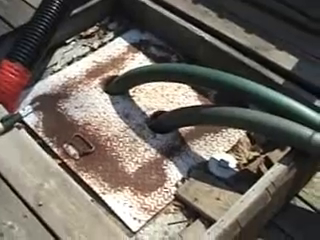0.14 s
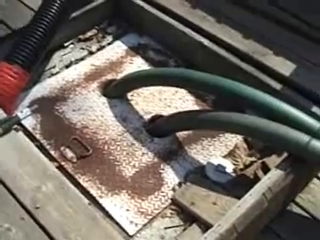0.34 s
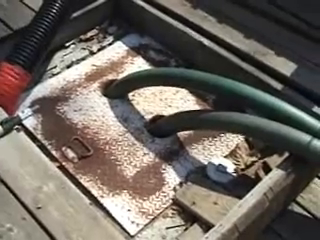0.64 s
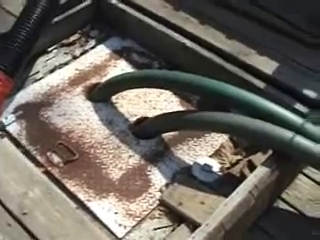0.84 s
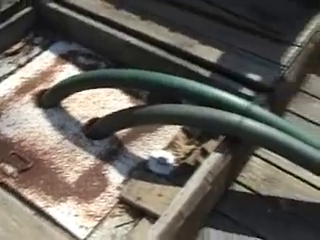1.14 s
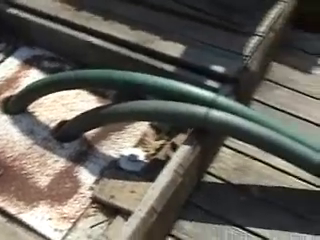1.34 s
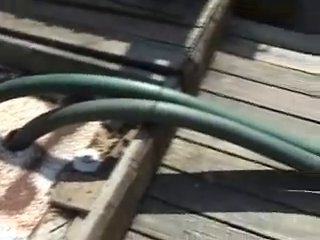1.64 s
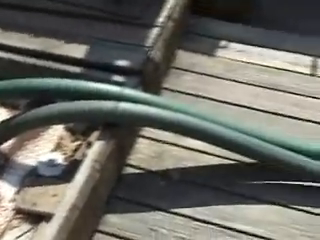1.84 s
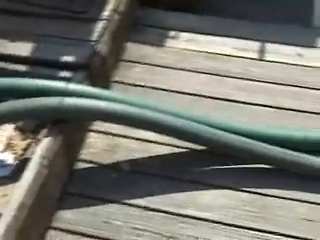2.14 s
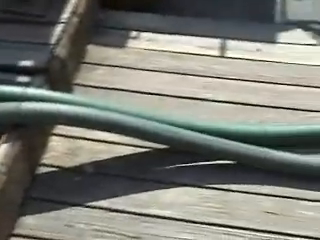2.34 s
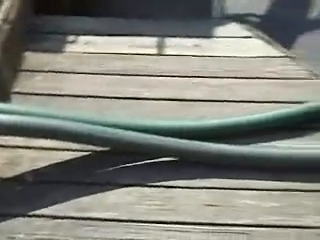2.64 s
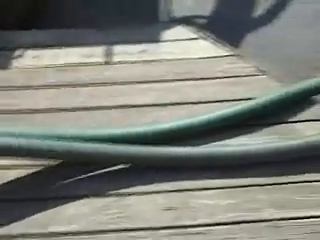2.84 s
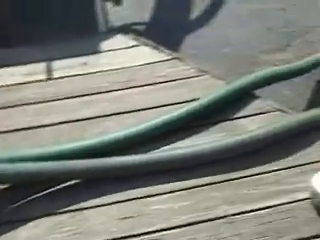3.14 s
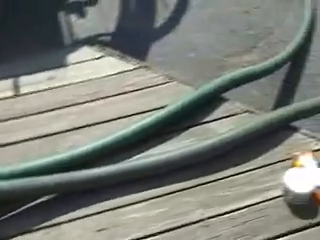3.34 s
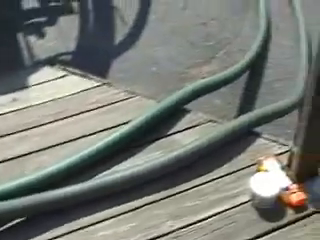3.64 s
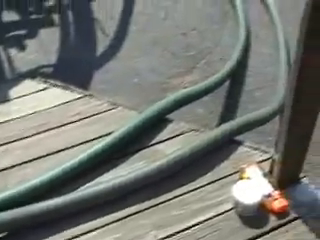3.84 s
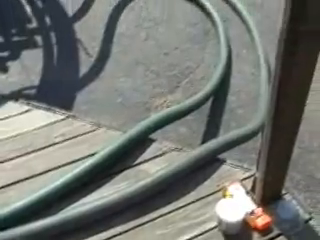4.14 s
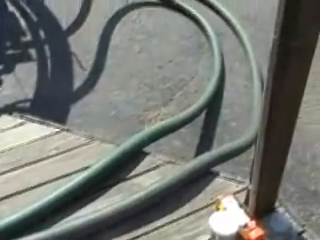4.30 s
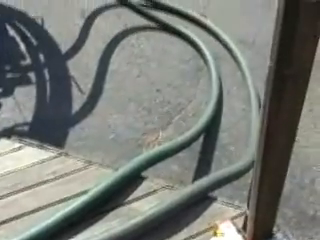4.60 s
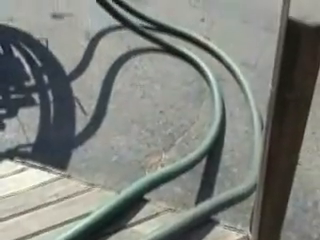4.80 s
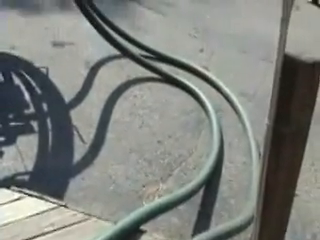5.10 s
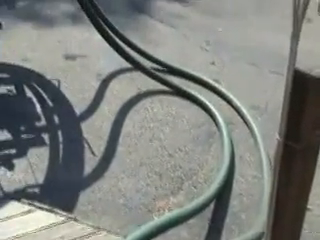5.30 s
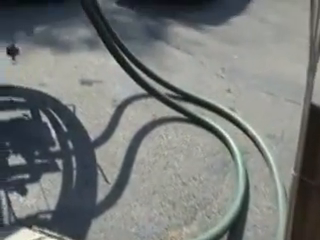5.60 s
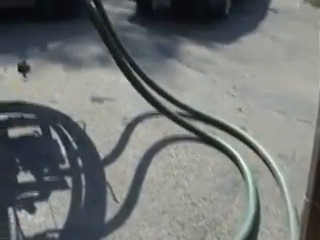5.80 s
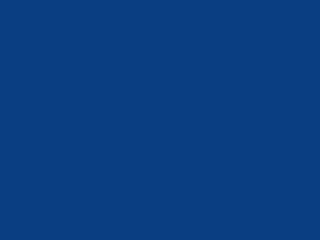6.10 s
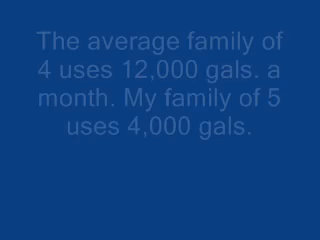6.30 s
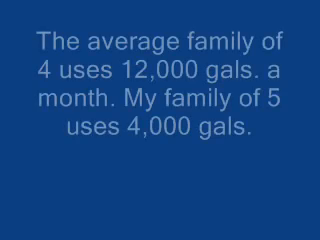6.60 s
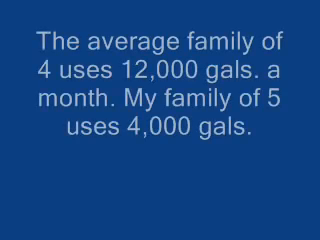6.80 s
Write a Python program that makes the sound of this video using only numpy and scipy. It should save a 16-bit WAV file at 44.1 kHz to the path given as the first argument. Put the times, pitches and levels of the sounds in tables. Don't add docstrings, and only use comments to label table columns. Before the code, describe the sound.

From the first instant a truck engine and its water pump run loudly at a fixed speed, a few metres away outdoors. The hum is low and buzzing, with a fast flutter of about twenty-one beats per second, covered by a wide roar of fan and water, rapid valve clacks and pulsing air hiss. A hollow tone near 420 hertz and a wavering panel ring sit inside it. From about 1 to 2 seconds the handheld microphone swings toward the pump; whine, spray and metallic clatter grow brighter. Around 2.7 seconds the panel ring fades. Soft low wind bumps come and go, stronger near 4.5, 4.8 and 6.1 seconds. After 4.5 the low hum thins slightly, while the hollow tone dips briefly near 4.9. The stereo balance drifts gently. At about 6.2 seconds everything cuts off, leaving silence until about 7 seconds.

```python
import sys
import numpy as np
from scipy import signal
from scipy.fft import rfft, irfft, next_fast_len
from scipy.io import wavfile
from scipy.ndimage import uniform_filter1d, map_coordinates

SR = 44100
rng = np.random.default_rng(int(sys.argv[2]) if len(sys.argv) > 2 else 0)


def inscribe(sig):
    pcm = np.round(np.clip(np.atleast_2d(sig).T, -1, 1) * 32767)
    wavfile.write(sys.argv[1], SR, pcm.astype(np.int16))


def volts(x):
    e = np.asarray(x, float) / 20
    return 10 ** e


N = 306495
TIME_S = np.arange(N) / SR
CYCLE_HZ = 21.53
STOP_S = 6.232

# (time [s], peak level [dB], half length [s])
GUST_TIMES = [(0.4, -63, 0.2), (1.1, -50, 0.06), (1.46, -45, 0.08), (2.1, -46.5, 0.066), (2.35, -46, 0.12),
              (2.67, -46.5, 0.1), (3.24, -51.5, 0.16), (3.76, -43.5, 0.12), (4.06, -43.5, 0.16),
              (4.46, -37.5, 0.1), (4.77, -37.5, 0.18), (5.27, -47, 0.27), (6.07, -35.5, 0.08)]
# (time [s], facing the pump [0-1], left minus right [dB])
CAMERA_SWING = [(0.05, 0, -2), (0.8, 0.0, -3.5), (1.75, 0.44, -2.5), (2.05, 0.54, -2), (2.3, 0.5, 0),
                (3.5, 0.65, 2), (4.05, 0.5, 4), (4.22, 0.74, 1.5), (4.48, 0.6, 3.5), (4.72, 0.9, -1),
                (5.1, 0.66, 2.5), (6.0, 0.87, -0.5), (6.22, 0.97, 1)]
# (time [s], extra travel time [ms])
TRAVEL_LAG = [(0.2, 0.44), (0.7, -0.53), (1.2, -1.49), (1.7, -1.83), (2, -1.03), (2.4, -0.67), (3, -0.61),
              (3.6, -0.49), (4.2, 0.08), (4.6, 0.16), (5, -0.36), (5.4, 0.11), (5.7, 0.76), (6, 0.69)]
# (start [s], end [s])
WIDE_SPANS = [(0.053, 0.102), (0.145, 0.22), (0.286, 0.429), (0.463, 0.606), (0.732, 0.851), (0.924, 1.034),
              (1.06, 1.202), (1.343, 1.542), (1.622, 1.67), (3.632, 3.674), (3.942, 4.007), (4.033, 4.132),
              (4.457, 4.512), (4.549, 4.61), (5.195, 5.308), (5.723, 5.769)]
# (frequency [Hz], level [dB per Hz])
ROAR_SPECTRUM = [(40, -18), (70, -8), (200, -0.5), (420, 1.5), (560, -2.5), (900, 1.5), (1200, -1),
                 (1400, -1.5), (1800, -2.5), (2200, -3.5), (2600, -4.5), (3400, -5.5), (3700, -8.5),
                 (4000, -21)]
# (frequency [Hz], level [dB per Hz])
ROAR_SIDE_SPECTRUM = [(40, -7), (100, -11), (170, -4.5), (300, 5.5), (600, 3.5), (1600, 4.5), (2300, 3.5),
                      (3100, 2.5), (3600, 0), (3950, -11.5), (4200, -19.5)]
# (frequency [Hz], level [dB per Hz])
HISS_SPECTRUM = [(3300, -18.5), (3900, -2.5), (5000, -1.5), (6200, -4), (7200, -7), (9500, -30)]
# (frequency [Hz], level [dB per Hz])
SPRAY_SPECTRUM = [(5200, -24), (6600, -5), (7600, 0), (9000, -1), (11430, -4), (11480, -20), (11700, -24),
                  (11800, -55)]
# (place [0-1], length [cycles], level [dB])
VALVE_BLOWS = [
    (.29, .13, -1),
    (.66, .12, -10),
]
# (place [0-1], length [cycles], level [dB])
ROAR_KNOCK = (.7, 0.098, -4.5)
# (frequency [Hz], width [Hz], level [dB])
COVER_MODES = [
    (5510, 140, 0),
    (7070, 90, -6),
    (8330, 90, -8),
]
# (ratio to the lowest [1], level [dB])
BODY_PANEL_MODES = [(1, 1.5), (1.43, -6.5), (1.74, -2), (2.1, -8)]
# (multiple of the cycle [1], level [dB], lobe gain [dB],
# lobe time [s], lobe half width [s])
PUMP_LOBES = [(22, -49, 9, 1.2, 2.4), (24, -45.5, 8.5, 0.8, 1.5), (27, -48, 9.5, 5.1, 2.5),
              (30, -46.5, 13, 2.25, 0.8), (30, -47, 10, 6.1, 0.6), (47, -41, 3.5, 3.7, 1.5),
              (64.04, -40.5, 4, 2.7, 0.4)]
# (multiple of the cycle [1], level [dB])
WHINE_ORDERS = [(29, -18), (33, -12.5), (34, -21), (36, -8), (38, -9.5), (39, -14), (42, -13.5), (44, -9.5),
                (46, -12.5), (49, -13), (51, -20), (63, -9.5), (66, -12.5), (69, -13.5), (91, -18.5)]
# (multiple of the cycle [1], level [dB])
ENGINE_ORDERS = [(3, -11), (4, -16.5), (5, -12), (6, -7.5), (7, -19.5), (8, -9), (9, -7), (10, -5.5),
                 (11, -3.5), (12, -4.5), (13, -6.5), (14, -5.5), (15, -8), (16, -13), (18, -17), (19, -8),
                 (20, -21), (21, -20), (22, -16), (23, -17), (25, -17.5)]


def level(x, db):
    return x * volts(db) / np.sqrt(np.mean(x ** 2))


def curves(table):
    s, *columns = np.transpose(table)
    return [np.interp(TIME_S, s, c) for c in columns]


def bump(at_s, half_s, order=2):
    return np.exp(-((TIME_S - at_s) / half_s) ** order)


def step(at_s, span_s):
    return .5 + .5 * np.tanh((TIME_S - at_s) / span_s)


def walk(rate):
    hold = int(SR / 64 / rate)
    steps = np.repeat(rng.standard_normal(N // 64 // hold + 2), hold)
    smooth = uniform_filter1d(uniform_filter1d(steps, hold), hold)
    return 1.3 * np.interp(np.arange(N) / 64, np.arange(len(steps)), smooth)


def colour(x, shape):
    hz, db = np.transpose(shape)
    size = next_fast_len(N)
    log_f = np.log(np.arange(size // 2 + 1) * SR / size + 1e-9)
    gain = volts(np.interp(log_f, np.log(hz), db, left=-90, right=-90))
    return irfft(rfft(x, size) * gain, size)[:N]


def patchy(shape, gate, patch_db, rate, count):
    size = next_fast_len(N)
    edges = np.geomspace(shape[0][0], shape[-1][0], count + 1)
    x = rfft(colour(rng.standard_normal(N) * gate, shape), size)
    f = np.arange(len(x)) * SR / size
    out = 0
    for lo, hi in zip(edges, edges[1:]):
        band = irfft(x * ((f >= lo) & (f < hi)), size)[:N]
        out = out + band * volts(patch_db * walk(rate))
    return level(out, 0)


def puffs(cycle, table, scatter_db):
    size = volts(scatter_db * rng.standard_normal((int(cycle[-1]) + 3, len(table))))
    out = np.ones(N)
    for k, (place, decay, db) in enumerate(table):
        p = cycle + 1 - place
        out = out + volts(db) * size[p.astype(int), k] * np.exp(-(p % 1 / decay) ** 2)
    return uniform_filter1d(out, size=30)


def tones(cycle, table, wander_db, slip, rate, scatter):
    out = 0
    for k, db in table:
        start = scatter * rng.standard_normal()
        turns = k * cycle + k * k / 5 + start + slip * walk(rate)
        out = out + volts(db + wander_db * walk(rate)) * np.sin(2 * np.pi * turns)
    return out


def drone(hz, db, rate, steady):
    swing = steady + walk(rate) + 1j * walk(rate)
    return volts(db) * level(np.real(swing * np.exp(2j * np.pi * np.cumsum(hz) / SR)), 0)


def wind():
    gusts = sum(volts(db) * bump(s, half) for s, db, half in GUST_TIMES)
    shape = [(8, -11), (20, -9.5), (45, -5.5), (90, -16.5), (200, -45.5)]
    return level(colour(rng.standard_normal(N), shape), 0) * (volts(-74) + gusts)


def uncorrelated(gate, roar_db, hiss_db, spray_db, roar_gate):
    roar = level(colour(rng.standard_normal(N) * roar_gate, ROAR_SIDE_SPECTRUM), -6)
    hiss = level(colour(rng.standard_normal(N) * gate, HISS_SPECTRUM), -7.5)
    spray = level(colour(rng.standard_normal(N) * gate, SPRAY_SPECTRUM), -5)
    return roar * volts(roar_db) + hiss * volts(hiss_db) + spray * volts(spray_db)


def water_spray(gate, db):
    return volts(db + 1.1) * patchy(SPRAY_SPECTRUM, gate, patch_db=.5, rate=11, count=2)


def air_hiss(gate, db):
    return volts(db - 1.4) * patchy(HISS_SPECTRUM, gate, patch_db=.5, rate=10, count=2)


def fan_roar(gate, db):
    return volts(db - 0.31) * patchy(ROAR_SPECTRUM, gate, patch_db=0.68, rate=7.9, count=6)


def clatter(cycle, morph_s):
    patterns = rng.standard_normal((int(N / SR / morph_s) + 3, 2049))
    x = map_coordinates(patterns, [TIME_S / morph_s, cycle % 1 * 2048], order=1)
    shape = [(500, -15.0), (800, -3.0), (2000, -5.5), (3500, -9.0), (6000, -16.0), (8000, -39.0)]
    return level(colour(x, shape), 0)


def valve_cover(cycle):
    gate = puffs(cycle, VALVE_BLOWS, scatter_db=2.3)
    size = next_fast_len(N)
    f = np.arange(size // 2 + 1) * SR / size
    ring = sum(volts(db) / (1 + 1j * (f - hz) / (w / 2)) for hz, w, db in COVER_MODES)
    return level(irfft(rfft(rng.standard_normal(N) * (gate - .95), size) * ring, size)[:N], 0)


def body_panel():
    shade = step(2.7, 0.23)
    hz, db = 1480 - 38 * shade, -37 - 7 * shade
    return sum(drone(hz * k, db + mode_db, rate=170, steady=0) for k, mode_db in BODY_PANEL_MODES)


def tank():
    hz = 421.5 + 1.2 * TIME_S
    return drone(hz, -32 - 11 * bump(4.85, 0.5), rate=15, steady=1.6)


def whine(cycle, db):
    x = tones(cycle, WHINE_ORDERS, wander_db=2.5, slip=.08, rate=2.98, scatter=0.94)
    return level(x, -12) * volts(db)


def pump(cycle):
    lines = [(round(k), db + lobe_db * bump(s, half, order=4))
             for k, db, lobe_db, s, half in PUMP_LOBES]
    return volts(4.0) * tones(cycle, lines, wander_db=0.55, slip=0.018, rate=2.7, scatter=1.0)


def gear_mesh(cycle, db):
    turns = 17 * cycle + 0.01 * walk(rate=8.5)
    return volts(4.5 + db + 1.2 * walk(rate=7)) * np.sin(2 * np.pi * turns)


def engine(cycle, db):
    x = tones(cycle, ENGINE_ORDERS, wander_db=1.0, slip=.02, rate=1.2, scatter=.1)
    return level(x, 0) * volts(db)


def scene():
    facing, pan_db = curves(CAMERA_SWING)
    off_deck = step(4.5, 0.095)
    tone_db = -25 + 3 * facing - 2 * off_deck
    gear_db = -30 + 2.4 * facing - 2.5 * off_deck
    roar_db = -24.5 + 2.3 * facing + 0.5 * off_deck
    hiss_db = -33 + 1.6 * facing + 0.3 * off_deck
    spray_db = -40 + 7.5 * facing + 0.1 * off_deck
    cover_db = -50.5 + 15 * facing - off_deck

    cycle = CYCLE_HZ * (TIME_S - curves(TRAVEL_LAG)[0] / 1000)
    hiss_gate = puffs(cycle, VALVE_BLOWS, scatter_db=1.5)
    roar_gate = puffs(cycle, [ROAR_KNOCK], scatter_db=2.5)

    aside = tank() + body_panel() + whine(cycle, roar_db + 5 * facing) + pump(cycle)
    roar = fan_roar(roar_gate, roar_db) + volts(roar_db - 7.0) * clatter(cycle, morph_s=.35)
    hiss = air_hiss(hiss_gate, hiss_db) + volts(cover_db) * valve_cover(cycle)
    mid = aside + roar + hiss + water_spray(hiss_gate, spray_db)
    bass = engine(cycle, tone_db) + gear_mesh(cycle, gear_db) + 0.41 * wind()

    side = uncorrelated(hiss_gate, roar_db, hiss_db, spray_db, roar_gate) + wind()
    side = side + volts(-25.0) * np.roll(aside, shift=40) + volts(-25) * np.roll(bass, shift=150)
    side = side + volts(-52) * np.sin(2 * np.pi * (3 * cycle + .05))
    return bass + mid * volts(np.array([pan_db, -pan_db]) / 2) + side * np.array([[1], [-1]])


def thin(spec, f, under_db, from_hz):
    power = np.abs(spec) ** 2
    strong = power > volts(2 * under_db) * uniform_filter1d(power, size=24, axis=0)
    return spec * (strong | (f[:, None] < from_hz))


def fold(mid, side, drift, bias, band_hz):
    frames = dict(fs=SR, window="cosine", nperseg=2048, noverlap=1024)
    f, t, spec = signal.stft(np.array([mid, side]), **frames)
    wide, narrow = 0, 0
    for a, b in WIDE_SPANS:
        wide = wide + np.exp(-((t - np.clip(t, a, b)) / np.where(t < a, 0.07, 0.06)) ** 2)
        narrow = narrow + np.exp(-((t - b - 0.26) / 0.13) ** 2)
    wide = np.clip(0.95 * wide, 0, 1)
    narrow = np.clip(0.54 * narrow, 0, 1)
    usual = np.where(f[:, None] < 1300, 0.45, 0.57) * np.where(f[:, None] < 330, .4, 1)
    share = usual * (1 - narrow) * (1 - wide) + wide

    band = (f / band_hz).astype(int)
    count = band[-1] + 1
    roam = rng.random((count, 1)) + np.cumsum(drift * rng.standard_normal((count, len(t))), axis=1)
    keep = np.abs(roam % 2 - 1)[band] < np.clip(share, 0, 1) ** bias
    gusty = sum(np.abs(t - s) < 0.94 * half for s, db, half in GUST_TIMES) > 0
    keep[f < 130] = (wide > .5) | gusty
    keep[(f > 560) & (f < 690)] = narrow < .9
    keep[f > 4050] = sum((t > a) & (t < b) for a, b in WIDE_SPANS) > 0
    mid_spec = thin(spec[0], f, under_db=-6.5, from_hz=1600)
    side_spec = thin(spec[1], f, under_db=-3, from_hz=700) * keep
    return signal.istft(np.array([mid_spec, side_spec]), **frames)[1][:, :N]


def top_cut(x):
    return signal.sosfilt(signal.butter(12, 11720, fs=SR, output="sos"), x)


def record(dry):
    left, right = np.tanh(1.1 * dry) / 1.1
    mid, side = fold((left + right) / 2, (left - right) / 2, drift=.11, bias=1.5, band_hz=110)
    after = TIME_S - STOP_S
    faint_tail = volts(-19 - 500 * after) * (after < .026)
    gain = uniform_filter1d(np.where(after < 0, 1., faint_tail), size=60)
    return top_cut(np.array([mid + side, mid - side]) * gain)


dry = scene()
out = record(dry)
inscribe(out)
```